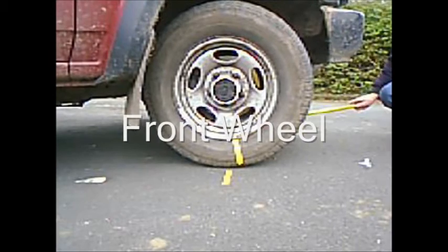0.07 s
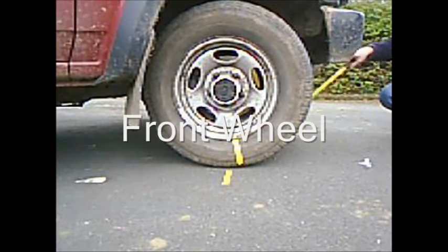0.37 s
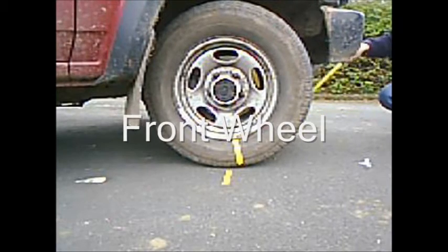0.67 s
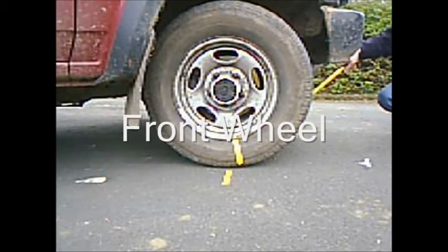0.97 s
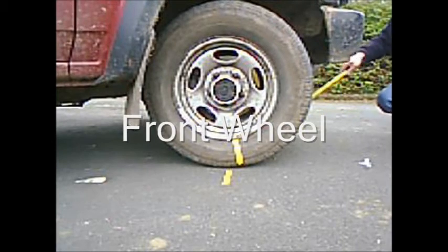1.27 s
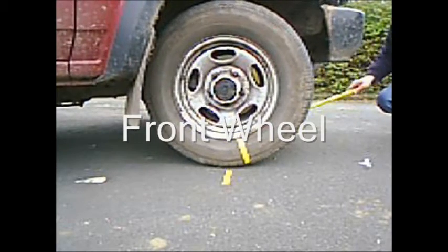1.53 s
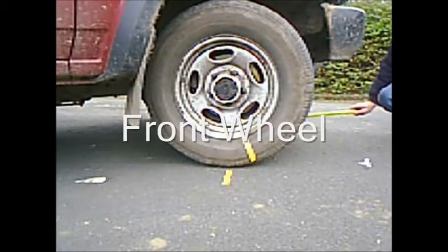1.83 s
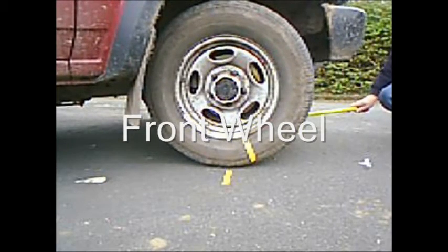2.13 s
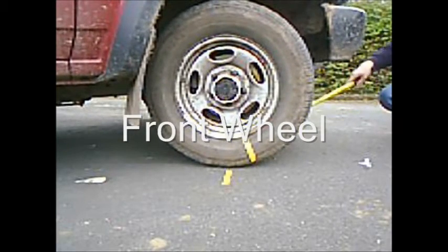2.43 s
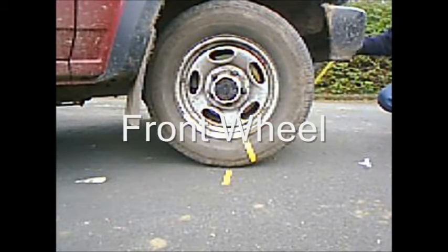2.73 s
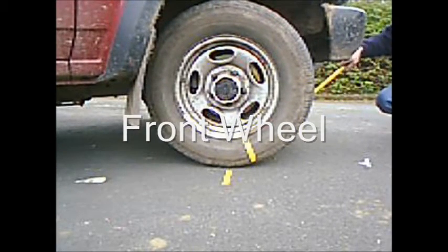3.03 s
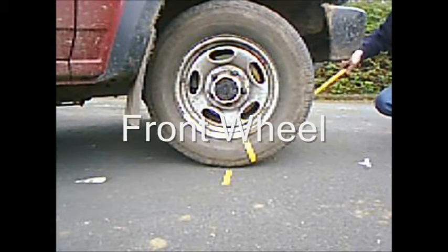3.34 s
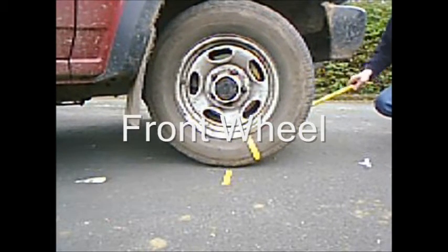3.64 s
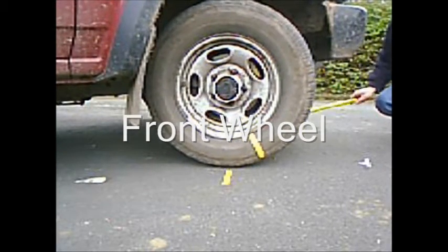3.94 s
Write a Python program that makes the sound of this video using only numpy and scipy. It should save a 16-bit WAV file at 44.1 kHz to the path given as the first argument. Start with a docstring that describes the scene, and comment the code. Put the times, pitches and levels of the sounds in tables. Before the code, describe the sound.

A hand-worked steel lever clicks and scrapes beside a car wheel, with soft thuds at about 0.25 and 0.9 seconds. Quick clanks cluster from 1.5 to 2.2 seconds, loudest at 1.8, ringing hollowly under the car. Single clanks and thuds follow near 3 and 3.8 seconds. Thin chirps dot the first second, and a faint bird calls around 2.3. Outdoor air rushes steadily throughout, with a gritty treble.

```python
"""Outdoors, beside a car's front wheel, where a long steel lever is worked up and down by hand.
Its joint scrapes, clicks and clanks with a quick rebound; the car's underbody answers with hollow
rings, and the shifting load thuds. Further off lie thin chirps, a bird's falling notes, faint tones
and a steady rush of air. The microphone is a small camera's, whose low sample rate adds a gritty treble."""
import sys
import numpy as np
from scipy import signal
from scipy.fft import rfft, irfft
from scipy.io import wavfile

SR = 44100
rng = np.random.default_rng(int(sys.argv[2]) if len(sys.argv) > 2 else 0)


def store_pcm(level_fs):
    """Save levels as 16-bit WAV."""
    pcm = np.round(np.clip(level_fs, -1, 1) * 32767).astype(np.int16)
    wavfile.write(sys.argv[1], SR, np.atleast_2d(pcm).T)


N = 176400


def undb(db):
    """Decibels to gain."""
    return 10 ** (np.asarray(db) / 20)


def unit(x):
    """Scale to rms 1."""
    return x / np.sqrt(np.mean(x ** 2) + 1e-20)


def add(out, start, x):
    """Mix x into out from a time in seconds."""
    i = max(int(start * SR), 0)
    out[i:i + len(x)] += x[:max(len(out) - i, 0)]


def noise(points, tilt_db=0, size=N):
    """Noise of rms 1 with a spectrum of (Hz, dB) points, tilted per octave."""
    hz, db = np.array(points).T
    octave = np.log2(np.fft.rfftfreq(size, 1 / SR) + 1)
    gain = undb(np.interp(octave, np.log2(hz), db, right=-np.inf) + tilt_db * octave)
    return unit(irfft(rfft(rng.standard_normal(size)) * gain, size))


def wander(per_s):
    """A random curve with a spread near 1, through per_s new values a second."""
    return np.interp(np.arange(N) / SR * per_s, np.arange(2048), rng.standard_normal(2048))


def swell(length):
    """A rounded rise and fall over a length in seconds."""
    return np.sin(np.linspace(0, np.pi, max(int(length * SR), 2)))


def tone(hz):
    """A sine that follows a pitch curve."""
    return np.sin(2 * np.pi * np.cumsum(hz) / SR)


def ring(modes, t):
    """Decaying (Hz, dB, t60) modes of alternating sign."""
    return sum((-1) ** k * undb(db - 60 * t / t60) * np.sin(2 * np.pi * hz * t)
               for k, (hz, db, t60) in enumerate(modes))


def excite(drive, response):
    """Pass a drive through a ringing response of unit energy."""
    return signal.fftconvolve(drive, response / np.linalg.norm(response))[:N]


def struck(rows, centre_hz, fall_db):
    """Weight (Hz, dB, ..) rows as a contact drives them: fall_db less per octave from centre_hz."""
    return [(hz, db - fall_db * abs(np.log2(hz / centre_hz)), *rest) for hz, db, *rest in rows]


# Modes of the lever and its joint. Each row: pitch in Hz, relative level in dB, t60 in seconds.
STEEL_MODES = [(805, -7, .09), (1116, -11, .085), (1210, -3.5, .1), (1299, -11, .08), (1380, -13, .085),
               (1608, -3, .095), (1680, -11, .08), (1733, -13, .08), (1838, -6, .095), (1940, -3, .1),
               (2058, -10, .085), (2320, -14, .045), (2520, -17, .045)]
# Spectrum of the contact noise. Each row: frequency in Hz, relative density in dB.
CRACK_SPECTRUM = [(200, -10), (700, 0), (1200, -0.5), (1700, -1.5), (2100, 0.5), (2600, -4), (3300, 1),
                  (4000, 0)]
def blow(t, centre_hz, fall_db):
    """One steel-on-steel contact: a short crack and the ring of the lever."""
    rise_s, crack_s = .0003, .004
    crack = noise(struck(CRACK_SPECTRUM, centre_hz, fall_db), size=len(t)) * np.exp(-t / crack_s)
    steel = ring(struck(STEEL_MODES, centre_hz, fall_db), t)
    return (undb(-2.5) * steel + undb(-9) * crack) * (1 - np.exp(-t / rise_s))


# Hollow modes under the car. Each row: pitch in Hz, relative level in dB, t60 in seconds.
UNDERBODY_MODES = [(238, -14.5, 0.11), (400.7, -6.5, 0.074), (486, -7, 0.13), (547, -12.5, 0.14),
                   (730, -11, .07)]
# Lever blows at the wheel. Each row: start in seconds, gain in dB, centre in Hz, rebound delay in
# seconds, rebound in dB against the blow, rebound centre in Hz, fall-off in dB per octave,
# underbody in dB against the blow.
LEVER_BLOWS = [(0.2445, -32.5, 1580, .008, 0, 1600, 19, -8),
               (0.7985, -34, 1950, 0.0034, -2.5, 1900, 8, -15),
               (0.889, -28, 1800, 0.003225, 2.5, 1590, 22, -18),
               (1.5625, -29.5, 1620, 0.00597, -7, 950, 12, -7),
               (1.5906, -30.5, 1250, 0.0044, -4, 1600, -6, -1),
               (1.6021, -29.5, 1620, 0.0071, 2, 1650, 13, -7), (1.644, -24, 1880, .005, -5, 1700, 16, -17),
               (1.6717, -22, 1400, .0062, -1, 2030, 14.5, -2.5),
               (1.8095, -32, 1840, .003, -9, 1700, 14, -24),
               (1.8166, -16.5, 1420, 0.0091, -0.5, 1880, 11, -2),
               (1.8803, -32, 1300, 0.011, -1, 1300, 9, -10),
               (2.0066, -23.5, 2500, .0072, -3, 2120, 16, -16), (2.179, -35.5, 1300, .007, -5, 1500, 6, -6),
               (3.0198, -29.5, 1030, 0.0041, 3, 1580, 27, -6),
               (3.701, -26.5, 1600, 0.0034, -5, 1620, 17, -22),
               (3.8355, -27.5, 1990, 0.0031, -6.5, 1290, 17, -4)]
def clanks(t):
    """A rebound presses the parts together, stops the first ring and rings on; the underbody follows."""
    choke_s, body_lag_s, body_rise_s = .0012, .00552, .011
    out = np.zeros(N)
    body = ring(UNDERBODY_MODES, t) * (1 - np.exp(-t / body_rise_s))
    for start, db, hz, delay, rebound_db, rebound_hz, fall_db, body_db in LEVER_BLOWS:
        choke = np.exp(-np.maximum(t - delay, 0) / choke_s)
        add(out, start, undb(db) * blow(t, hz, fall_db) * choke)
        add(out, start + delay, undb(db + rebound_db) * blow(t, rebound_hz, fall_db))
        add(out, start + body_lag_s, undb(db + body_db) * body)
    return out


# Rubs in the lever's joint. Each row: start in seconds, length in seconds, gain in dB.
JOINT_RUBS = [(0.23, 0.032, -51), (0.32, 0.12, -46), (0.793, 0.064, -45.5), (0.849, 0.076, -39.5),
              (1.548, 0.095, -35.5), (1.657, .026, -45), (1.838, 0.032, -35), (3.001, 0.031, -40),
              (3.723, 0.048, -46), (3.848, 0.13, -48.5)]
def scrapes(t):
    """Dense uneven slips in the joint excite the steel and, more weakly, the underbody."""
    slips_per_s, spread_db, centre_hz, fall_db = 900, 5, 1530, 8.5
    slips = (rng.random(N) < slips_per_s / SR) * rng.choice([-1, 1], N)
    strength = undb(spread_db * rng.standard_normal(N))
    pressure = np.zeros(N)
    for start, length, db in JOINT_RUBS:
        add(pressure, start, undb(db) * swell(length))
    drive = unit(slips * strength) * pressure
    steel = excite(drive, ring(struck(STEEL_MODES, centre_hz, fall_db), t))
    body = excite(drive, ring(UNDERBODY_MODES, t))
    grit = pressure * noise(struck(CRACK_SPECTRUM, centre_hz, fall_db))
    return steel + undb(-10.5) * body + undb(-4.5) * grit


# Thuds at the car. Each row: start in seconds, pitch in Hz, level in dB, rise and t60 in seconds.
LOAD_THUDS = [(0.249, 134, -27.5, 0.0067, 0.12), (0.353, 116.6, -29, .01, 0.13),
              (0.798, 113, -35, .008, .16), (0.883, 121, -29, 0.014, 0.2), (0.93, 76, -31, 0.014, 0.13),
              (1.581, 99, -39, .008, .12), (1.817, 139, -36.5, 0.0069, .14),
              (2.578, 132, -31.5, 0.0073, 0.12), (2.891, 152, -38, .008, 0.15),
              (3.02, 130, -33.5, 0.0053, 0.066), (3.022, 76.6, -35, 0.0077, .35),
              (3.838, 421, -29.5, .006, 0.14), (3.848, 214, -33, 0.0055, .12), (3.976, 425, -33, .006, .12)]
# Low scuffs. Each row: start in seconds, length in seconds, level in dB.
LOW_SCUFFS = [(0.24, 0.048, -42), (0.854, 0.11, -44.5), (3.007, 0.046, -44.5), (3.823, 0.055, -39),
              (3.855, 0.072, -45), (3.953, 0.074, -39)]
# Spectrum of the scuffs. Each row: frequency in Hz, relative density in dB.
SCUFF_SPECTRUM = [(80, -16), (150, -14), (220, 8), (310, 4.5), (420, 5), (600, -3.5), (1200, -10.5),
                  (2500, -19), (4000, -42)]
def thuds(t):
    """Soft low knocks as the load shifts, and low scuffs nearby."""
    knocks, rub = np.zeros(N), np.zeros(N)
    for start, hz, db, rise, t60 in LOAD_THUDS:
        add(knocks, start, ring([(hz, db, t60)], t) * (1 - np.exp(-t / rise)))
    for start, length, db in LOW_SCUFFS:
        add(rub, start, undb(db) * swell(length))
    return knocks + rub * noise(SCUFF_SPECTRUM)


def scatter(sound, t):
    """Reflections off car and road reach the microphone as a short diffuse tail."""
    t60_s, rise_s = .36, .015
    tail = rng.standard_normal(len(t)) * undb(-60 * t / t60_s) * np.clip(t / rise_s, 0, 1)
    return excite(sound, tail)


# Thin chirps and squeaks. Each row: start in seconds, length in seconds, pitch in Hz, level in dB.
THIN_CHIRPS = [(0.041, 0.036, 3880, -47.5), (0.136, .035, 3860, -45.5), (0.165, 0.03, 3957, -40.5),
               (0.28, 0.014, 3900, -50), (0.3, 0.036, 3900, -47.5), (0.795, 0.018, 2530, -47),
               (0.858, 0.029, 2530, -39)]
def chirps():
    """Short whistles that waver in pitch and flutter in level."""
    waver, flutter_db = .018, 3
    out = np.zeros(N)
    for start, length, hz, db in THIN_CHIRPS:
        shape = swell(length)
        pitch = hz * (1 + waver * wander(per_s=208)[:len(shape)])
        level_db = db + flutter_db * wander(per_s=255)[:len(shape)]
        add(out, start, undb(level_db) * shape * tone(pitch))
    return out


# A bird far from the microphone. Each row: start in seconds, final pitch in Hz, level in dB.
BIRD_NOTES = [(2.228, 3200, -50), (2.291, 3180, -51), (2.352, 3020, -49), (2.412, 3080, -49),
              (2.486, 3040, -50)]
def bird():
    """A phrase of quick whistled notes, each dropping onto its pitch."""
    drop_hz, drop_s, waver_hz = 893, .0068, 60
    out, shape = np.zeros(N), swell(length=.038)
    drop = drop_hz * np.exp(-np.arange(len(shape)) / SR / drop_s)
    for start, hz, db in BIRD_NOTES:
        pitch = hz + drop + waver_hz * wander(per_s=300)[:len(shape)]
        add(out, start, undb(db) * shape * tone(pitch))
    return out


# Tones in the distance. Each row: pitch in Hz, opening level in dB, closing level in dB.
DISTANT_TONES = [(119, -64.5, -64), (138.3, -57.5, -66), (883, -55, -65), (907, -63.5, -60),
                 (1253, -51, -71), (1669, -56, -58)]
def distant_hum():
    """Faint sustained tones that drift in level and waver slightly in pitch."""
    drift_db, waver = 2, .0015
    out = np.zeros(N)
    for hz, start_db, end_db in DISTANT_TONES:
        level_db = np.linspace(start_db, end_db, N) + drift_db * wander(per_s=3.66)
        out += undb(level_db) * tone(hz * (1 + waver * wander(per_s=15)))
    return out


# Spectrum of the outdoor rush. Each row: frequency in Hz, relative density in dB before the tilt.
RUSH_SPECTRUM = [(32, -56), (55, -14.5), (120, -0.5), (197, -6), (233, -3), (276, -5), (364, -7),
                 (414, -6.5), (438, -3), (589, -6), (777, -4), (837, -5), (901, -7.5), (1050, -7),
                 (1240, -3), (1430, -6.5), (1720, -5.5), (2790, -14), (4600, -18.5), (5980, -49),
                 (10100, -120)]
# The rush at the microphone. Each row: time in seconds, level in dB.
RUSH_LEVELS = [(0, -42.5), (.45, -42), (1.1, -43), (1.9, -42.5), (2.5, -43.5), (2.8, -43), (3.4, -44),
               (4, -42)]
def open_air():
    """A steady, gently fluttering rush over a faint low rumble."""
    times, db = np.array(RUSH_LEVELS).T
    level_db = np.interp(np.arange(N) / SR, times, db) + .32 * wander(per_s=25.1)
    rush = undb(level_db) * noise(RUSH_SPECTRUM, tilt_db=.46)
    rumble = undb(-59.5) * noise([(15, -7), (40, -14), (70, -11), (200, -38), (1000, -70)])
    return rush + rumble


def scene():
    """What reaches the microphone, in mono: lever and car in front, birds and open air behind."""
    t = np.arange(SR // 2) / SR  # half a second for each ring to die away
    lever = clanks(t) + scrapes(t)
    foreground = lever + undb(-23) * scatter(lever, t) + thuds(t)
    return (foreground + chirps() + bird() + distant_hum() + open_air())[None]


def record(dry):
    """The camera holds each coarse sample as a step, mirroring the sound into a gritty treble."""
    camera_hz, top_hz, dc_offset = 8000, 15800, -.0285
    coarse = signal.resample(dry, N * camera_hz // SR, axis=1)
    steps = coarse[:, np.arange(N) * camera_hz // SR]
    lowpass = signal.ellip(12, .1, 90, top_hz, fs=SR, output="sos")
    return signal.sosfilt(lowpass, steps) + dc_offset


dry = scene()
out = record(dry)
store_pcm(out)
```